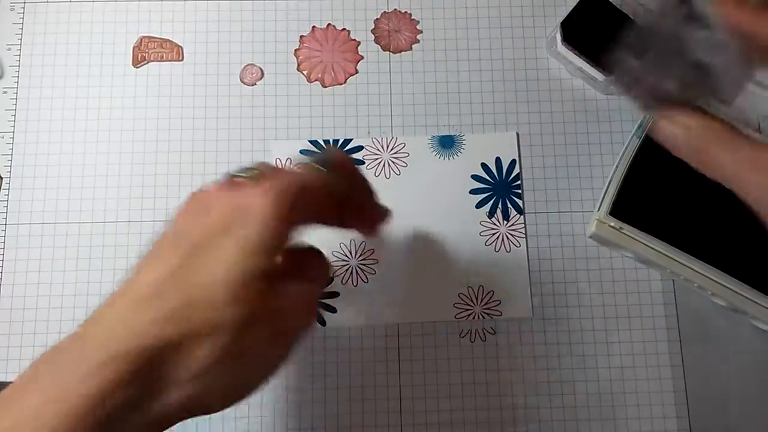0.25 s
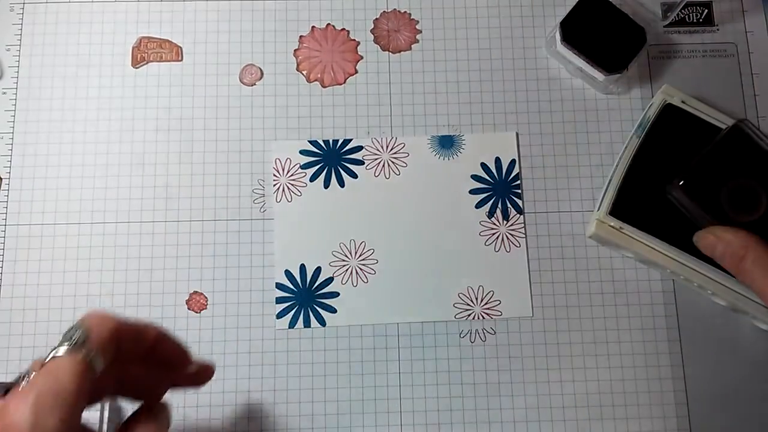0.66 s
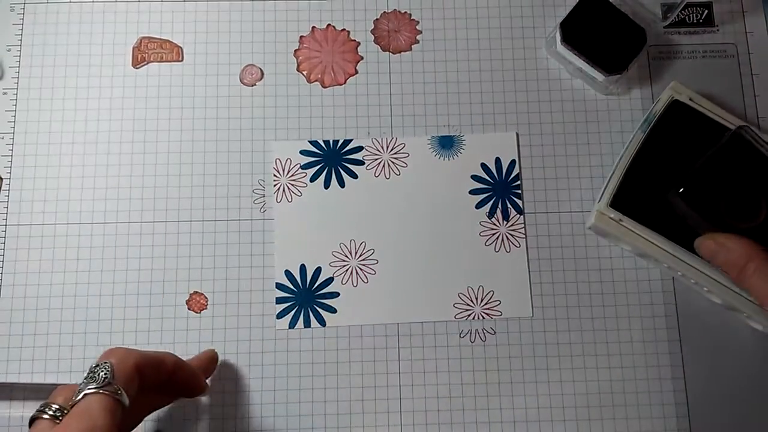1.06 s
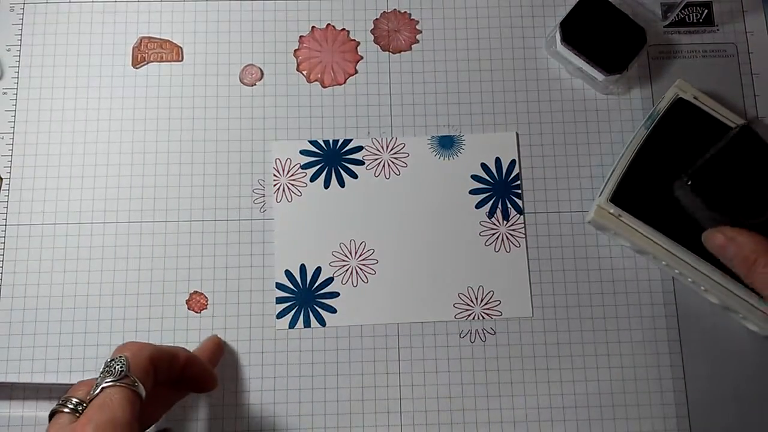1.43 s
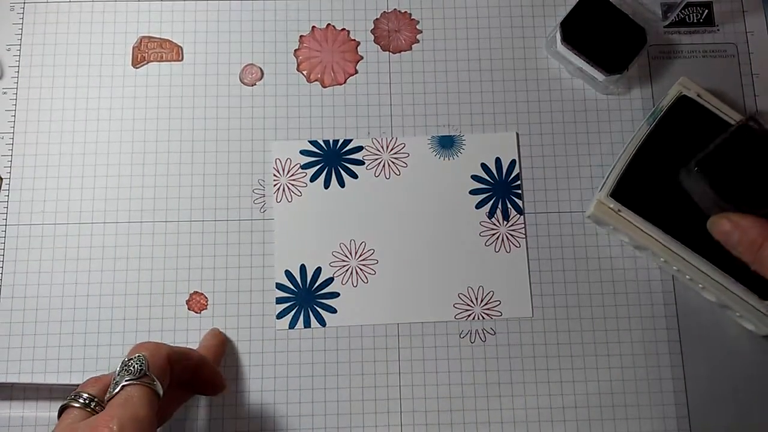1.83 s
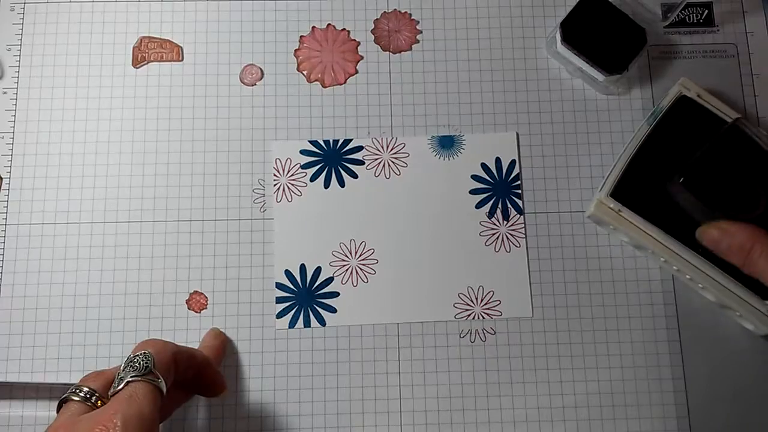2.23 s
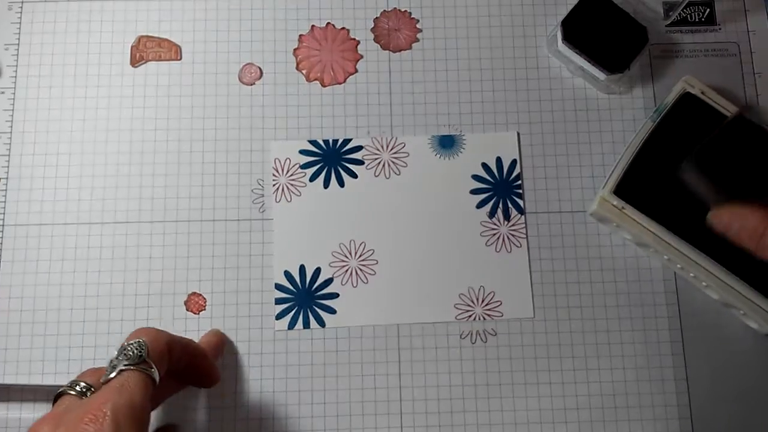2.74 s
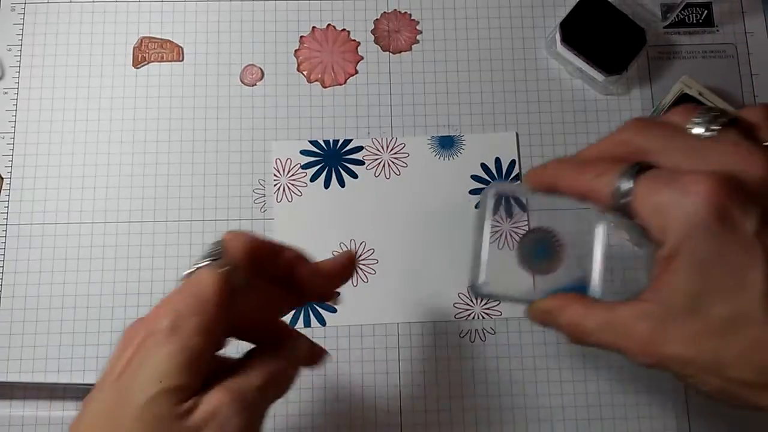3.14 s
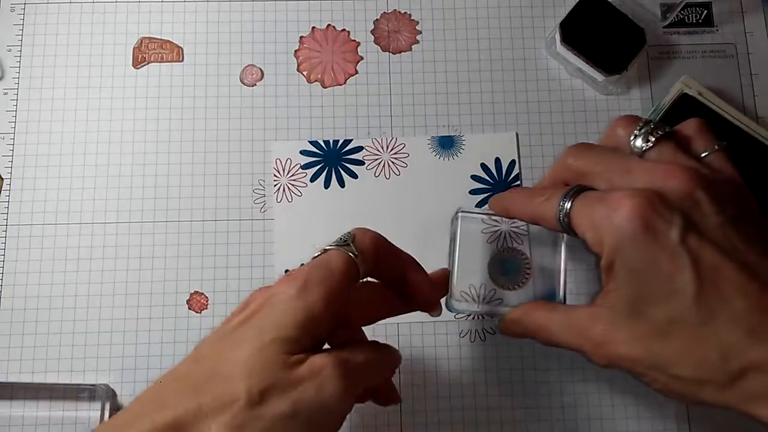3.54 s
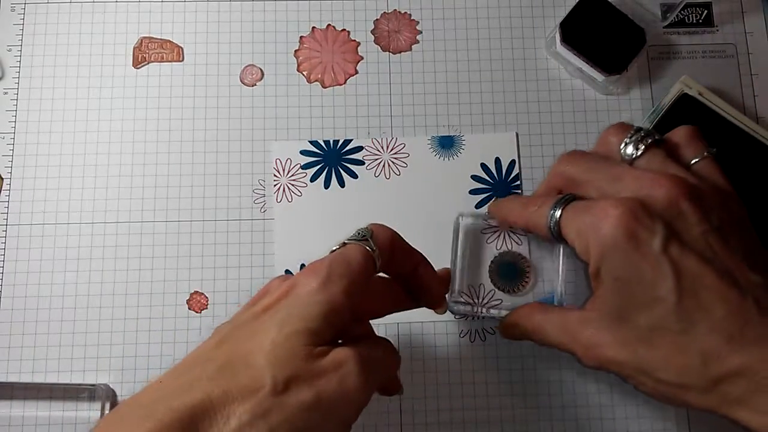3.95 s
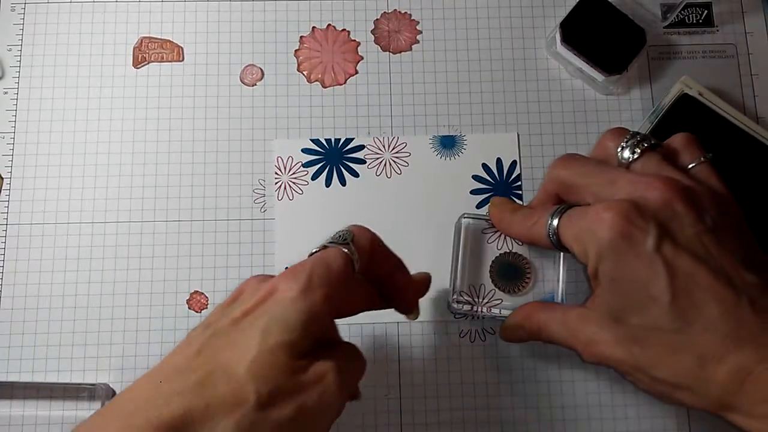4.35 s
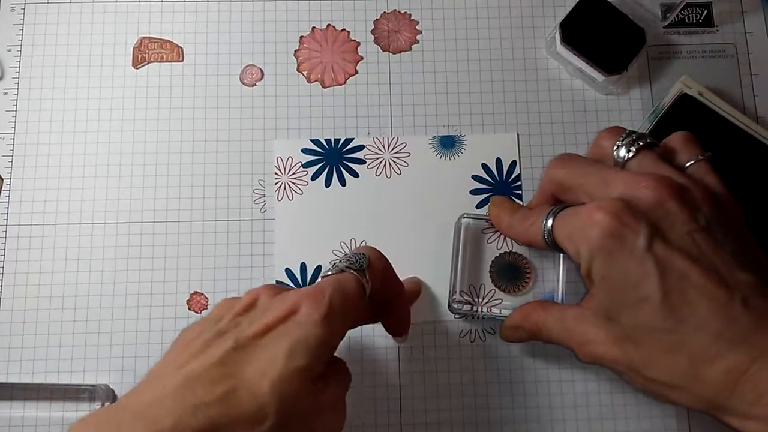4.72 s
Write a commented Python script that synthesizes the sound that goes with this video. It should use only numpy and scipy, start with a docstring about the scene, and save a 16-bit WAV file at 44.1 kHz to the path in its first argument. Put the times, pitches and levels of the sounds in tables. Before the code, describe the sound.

Five quick taps of a stamp block on an ink pad, with plastic clatters and faint squeaks between, then one duller thump on card.

```python
"""Small dry ticks of paper and fingers come first, with a few more later, over room hiss and mains hum.
Then a stamp on a clear block is tapped five times on an ink pad in a plastic case, close under a phone.
Each tap thumps the desk; after it come faint sounds and a clatter of the case, and most lifts squeak.
Last the stamp is pressed on a card with a duller thump. Blows are modal rings driven by a contact force,
squeaks are stick-slip tones; the phone turns the hiss down when nothing sounds."""
import sys
import numpy as np
from scipy import signal
from scipy.fft import rfft, irfft
from scipy.io import wavfile
from scipy.ndimage import uniform_filter1d, minimum_filter1d

SR = 44100
rng = np.random.default_rng(int(sys.argv[2]) if len(sys.argv) > 2 else 0)


def makeup_ratio(level_db):
    """Linear amplitude ratio for a level in decibels (20 dB per factor of ten)."""
    decades = np.asarray(level_db, float) / 20
    return 10 ** decades


def store_wav(level_fs):
    """Save 16-bit WAV to argv[1]."""
    pcm = np.round(np.clip(np.atleast_2d(level_fs), -1, 1) * 32767)
    wavfile.write(sys.argv[1], SR, pcm.T.astype(np.int16))


N = 219744  # samples in the scene
RING_SAMPLES = int(0.45 * SR)


def peak(x, db):
    """Normalisation: scale a sound to a peak level."""
    return x * makeup_ratio(db) / np.max(np.abs(x))


def add(track, s, x):
    """Superposition: mix a sound in at a time in seconds."""
    i = max(int(s * SR), 0)
    track[i:i + len(x)] += x[:N - i]


def band(x, hz, width):
    """Band-pass filtering around a centre; width is a frequency ratio to each side."""
    edges = [hz / width, min(hz * width, 0.45 * SR)]
    return signal.sosfilt(signal.butter(2, edges, "band", fs=SR, output="sos"), x)


def decay(t, t60):
    """Exponential damping: 60 dB lost in t60, in the same unit as t."""
    return np.exp(-np.log(1000) * t / t60)


# Block lands on the ink pad; columns: start_s, case_peak_db, desk_peak_db, sway_peak_db
PAD_TAPS = [(0.5842, -36, -31.5, -41), (1.0253, -25.5, -31, -39.5), (1.4931, -23.5, -29, -39),
            (1.9911, -25, -25.5, -38.5), (2.4783, -22, -23.5, -51.5)]


def taps():
    """Impact on a held body: under the block its modes sound at other levels, most of the high ones weaker."""
    out = np.zeros(N)
    for s, case_db, desk_db, sway_db in PAD_TAPS:
        push = force(contact_ms=0.6, rattle_ms=1.7)
        strike(out, s, push, case_db, desk_db, sway_db, held=True, at_card=False)
    return out


# Case knocks on the desk, and a few faint sounds as it lifts, one almost a squeak;
# columns: start_s, case_peak_db, desk_peak_db
CASE_KNOCKS = [(.763, -47, -56), (.862, -35.5, -51.5), (0.8744, -16, -30.5), (0.8802, -6, -20),
               (.887, -4.5, -15.5), (.898, -14, -21), (.909, -16, -32.5), (1.223, -47, -40.5),
               (1.3085, -14.5, -27.5), (1.328, -3.5, -12.5), (1.3447, -5, -18), (1.678, -50, -48.5),
               (1.759, -49, -50), (1.778, -28, -42), (1.7855, -20, -27), (2.225, -49.5, -40.5),
               (2.277, -39, -49.5), (2.287, -15, -28.5), (2.293, -10.5, -23), (2.3004, -14.5, -37),
               (2.3086, -22, -31), (2.695, -50, -54), (2.7514, -29.5, -40), (2.766, -10, -22),
               (2.78, -24, -31)]


def knocks():
    """Impact of a free body: a softer knock touches longer and rattles longer."""
    out = np.zeros(N)
    for s, case_db, desk_db in CASE_KNOCKS:
        contact_ms = 0.097 - 0.024 * case_db
        rattle_ms = 2.6 - 0.1235 * case_db
        sway_db = desk_db - 39.5  # the light case barely sways the desk
        strike(out, s, force(contact_ms, rattle_ms), case_db, desk_db, sway_db, held=False, at_card=False)
    return out


# Stamp meets the card; columns: start_s, case_peak_db, desk_peak_db, sway_peak_db
CARD_PRESS = [(3.9923, -43.5, -18, -40.5)]


def press():
    """Soft impact: a longer contact makes a duller thump."""
    out = np.zeros(N)
    for s, case_db, desk_db, sway_db in CARD_PRESS:
        push = force(contact_ms=0.97, rattle_ms=2.55)
        strike(out, s, push, case_db, desk_db, sway_db, held=True, at_card=True)
    return out


def strike(out, s, push, case_db, desk_db, sway_db, held, at_card):
    """Linear excitation: a force convolved with each body's impulse response gives its sound."""
    first_push = push[:int(0.002 * SR)]  # the desk takes only the first 2 ms
    lean = np.hanning(int(0.012 * SR))  # slow weight of the hand
    add(out, s, peak(signal.fftconvolve(push, case(held)), case_db))
    add(out, s, peak(signal.fftconvolve(first_push, desk(at_card)), desk_db))
    add(out, s, peak(signal.fftconvolve(lean, sway()), sway_db))


def force(contact_ms, rattle_ms):
    """Contact mechanics: one push, then loose re-contacts that swell and die; long contact is dull."""
    t = np.arange(int(0.05 * SR)) / SR * 1000  # ms
    chance = rng.random((2, len(t)))
    age = t / max(rattle_ms, 0.3)
    touches = chance[0] < 0.12
    bumps = touches * (2 * chance[1] - 1) * 1.26 * np.sqrt(age) * np.exp(-age)
    bumps[0] = 1
    u = 4 * t[:200] / max(contact_ms, 0.03)
    pulse = u * np.exp(-u)
    return np.convolve(bumps, pulse)


def ring(hz, db, t60, scatter_db, spread, neighbour_sign=1):
    """Modal synthesis: a sum of fading sines; no two blows wake the modes quite alike."""
    t = np.arange(RING_SAMPLES)[:, None] / SR
    detune, weight = rng.standard_normal((2, len(hz)))
    waves = np.sin(2 * np.pi * hz * (1 + spread * detune) * t) * decay(t, t60)
    sign = neighbour_sign ** np.arange(len(hz))
    return waves @ (makeup_ratio(db + scatter_db * weight) * sign)


# Modes of the plastic case, relative levels; columns: pitch_hz, loose_level_db, held_level_db, t60_s
CASE_MODES = [(910, -17, -10, .03), (997, -15, -12.5, 0.086), (1086, -6, -1.5, .025),
              (1171, -1.5, -5, 0.028), (1401, -4, -9.5, 0.026), (1712, -3, -12, 0.028),
              (2017, -2.5, -12, .02), (2432, -1, -6.5, .02), (2757, -5, -14, .015), (3105, -3, -15, 0.016),
              (3380, -1.5, -8.5, .015), (4680, -1.5, -7, 0.014), (5364, -3, -7.5, 0.023),
              (8500, -3.5, -10, .007)]


def case(held):
    """Modal ringing of a plastic shell; neighbouring modes start in opposite sign."""
    hz, loose_db, held_db, t60 = np.transpose(CASE_MODES)
    db = held_db if held else loose_db
    modes = ring(hz, db, t60, scatter_db=2, spread=0.02, neighbour_sign=-1)
    # a held case cracks as little as its top mode rings
    return modes + crack() * makeup_ratio(db[-1] - loose_db[-1])


def crack():
    """High modal density: modes too many to hear apart blur into a dull clack and a dry crack."""
    t = np.arange(RING_SAMPLES) / SR
    clack = band(rng.standard_normal(len(t)), 1700, 2.37) * decay(t, 0.02)
    dry_crack = band(rng.standard_normal(len(t)), 5600, 2.0) * decay(t, 0.013)
    return makeup_ratio(13) * clack + makeup_ratio(11) * dry_crack


# Bending modes of the desk top, relative levels; columns: pitch_hz, pad_level_db, card_level_db, t60_s
DESK_MODES = [(118.5, -8.5, -15, 0.25), (163.83, -18.5, -20.5, .15), (200, -17, -33, 0.22),
              (256.8, -9.5, -9, .11), (312, -2.5, 2.5, 0.07), (365.3, -1, -13, 0.074),
              (417.4, -2, -16, .09), (500.7, -11, -9.5, .05), (590, -12.5, -5.5, 0.05),
              (705, -15, -17, .04)]


def desk(at_card):
    """Plate bending: the striking point sets the mode levels, and the waves take a moment to fill the top."""
    hz, pad_db, card_db, t60 = np.transpose(DESK_MODES)
    rise_s = 0.001
    # at the card neighbouring modes start in opposite sign
    db, sign = (card_db, -1) if at_card else (pad_db, 1)
    modes = ring(hz, db, t60, scatter_db=1, spread=0.005, neighbour_sign=sign)
    return modes * (1 - np.exp(-np.arange(len(modes)) / (rise_s * SR)))


# Whole-desk sway modes, relative levels; columns: pitch_hz, level_db, t60_s
SWAY_MODES = [(60, 0.5, 0.88), (84, -8.5, 0.38)]


def sway():
    """Low-frequency resonance: the whole desk sways at a few low pitches."""
    hz, db, t60 = np.transpose(SWAY_MODES)
    return ring(hz, db, t60, scatter_db=1, spread=0.005)


# Ink lets go; columns: start_s, length_s, level_db (relative)
INK_SQUEAKS = [(0.833, 0.0062, -57.5), (.842, 0.018, -50), (1.277, 0.011, -55.5), (1.289, .018, -47),
               (2.254, .019, -54.5), (2.734, .017, -49.5)]


def squeaks():
    """Stick-slip friction: fast uneven slips of the ink film give a rough tone with overtones."""
    out = np.zeros(N)
    slip_hz = 1210
    for s, length_s, db in INK_SQUEAKS:
        n = int(length_s * SR)
        noise = rng.standard_normal((3, n))
        pitch_wobble, level_wobble = uniform_filter1d(noise[:2], size=60, axis=1) * 4.6
        phase = 2 * np.pi * np.cumsum(slip_hz * (1 + 0.1 * pitch_wobble)) / SR
        tone = np.sin(phase) + 0.18 * np.sin(2 * phase) + 0.05 * np.sin(3 * phase)
        rough = tone + 0.55 * band(noise[2], 1800, 1.9)
        level = makeup_ratio(db + 4.5 + 3.0 * level_wobble)
        add(out, s, level * rough * signal.windows.tukey(n, 0.2))  # sudden start
    return out


# Small dry ticks of paper and fingers; columns: start_s, peak_db, centre_hz
DRY_TICKS = [(.0, -34.5, 5270), (.051, -48, 3640), (.205, -47.5, 10700), (2.135, -58, 7800),
             (3.99, -41.5, 4780), (4.401, -52, 8520), (4.895, -50, 2513)]


def ticks():
    """Damped noise: short fading bursts of a wide band."""
    out = np.zeros(N)
    t = np.arange(int(0.1 * SR)) / SR
    for s, db, hz in DRY_TICKS:
        burst = band(rng.standard_normal(len(t)), hz, 2.0) * decay(t, 0.062)
        add(out, s, peak(burst, db))
    return out


# Decay of the small room by band; columns: centre_hz, t60_s
ROOM_DECAY = [(250, 0.15), (700, 0.2), (2000, 0.2), (5000, .21), (11000, 0.093)]


def room(x):
    """Diffuse reverberation: convolution with fading noise whose highest band dies first."""
    t = np.arange(RING_SAMPLES) / SR
    tail = np.zeros(len(t))
    for hz, t60 in ROOM_DECAY:
        tail += band(rng.standard_normal(len(t)), hz, 1.7) * hz ** -0.15 * decay(t, t60)
    tail *= np.clip(t / 0.0052 - 0.3, 0, 1)  # a short gap, then a build-up
    tail /= np.sqrt(np.sum(tail ** 2))  # unit energy
    return signal.fftconvolve(x, tail)[:N] * makeup_ratio(-18)


# Spectrum of hiss and rumble, relative levels; columns: pitch_hz, density_db (per Hz)
AIR_SPECTRUM = [(20, -9), (45, -4), (75, -5.5), (120, -17.5), (300, -20), (700, -25), (1300, -30.5),
                (4500, -31), (7000, -35.5), (10000, -33.5), (16000, -40.5)]


def air():
    """Spectral shaping: white noise filtered into smooth hiss and rumble."""
    hz, db = np.transpose(AIR_SPECTRUM)
    f = np.fft.rfftfreq(N, 1 / SR)
    shape = makeup_ratio(np.interp(np.log(f + 1), np.log(hz), db))
    noise = irfft(rfft(rng.standard_normal(N)) * shape, N)
    return noise / np.std(noise) * makeup_ratio(-60.5)  # dB rms


def walk(rate):
    """Smoothed random modulation: levels held 1 / rate s and slewed twice."""
    k = int(SR / rate)
    held = np.repeat(rng.standard_normal(N // k + 1), k)
    return uniform_filter1d(uniform_filter1d(held, k), k)[:N]


# Mains lines; columns: pitch_hz, level_db (rms, before the waver)
MAINS_LINES = [(59.2, -61.5), (177.6, -74.5), (296.1, -82), (414.5, -77), (532.9, -87.5), (721.4, -87)]


def hum():
    """Line spectrum: mains tones of fixed pitch whose levels waver slowly."""
    t = np.arange(N) / SR
    out = np.zeros(N)
    for k, (hz, db) in enumerate(MAINS_LINES):
        level = np.sqrt(2) * makeup_ratio(db + 2 * walk(4.3))
        out += level * np.sin(2 * np.pi * hz * t + k)
    return out


def scene():
    """Superposition of the desk sounds, their reverberation and the background."""
    near = taps() + knocks() + press() + squeaks() + ticks()
    return (near + room(near) + air() + hum())[None]


def band_limit(x):
    """A steep low-pass at the top of the band."""
    return signal.sosfilt(signal.butter(12, 16500, fs=SR, output="sos"), x)


def record(dry):
    """High-pass filtering and gating: the phone drops deep bass and turns the level down between sounds."""
    quiet_db, open_at_db, hold_s, close_s = -9.5, -56.5, 0.077, 0.025
    dry = signal.sosfilt(signal.butter(3, 45, "high", fs=SR, output="sos"), dry)
    power = uniform_filter1d(band(dry[0], 1100, 14.0) ** 2, size=300)
    # 0 = turned down, 1 = open
    opened = 1 / (1 + np.exp((open_at_db - 10 * np.log10(power + 1e-14)) / 1.5))
    hold = int(hold_s * SR)
    held = -minimum_filter1d(-opened, hold, origin=(hold - 1) // 2)  # running maximum
    keep = np.exp(-1 / (close_s * SR))
    sinking = signal.lfilter([1 - keep], [1, -keep], held)
    gate = np.maximum(held, sinking)
    mix = dry * makeup_ratio(quiet_db * (1 - gate))
    return band_limit(mix)


dry = scene()
out = record(dry)
store_wav(out)
```